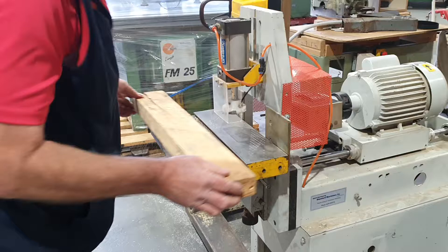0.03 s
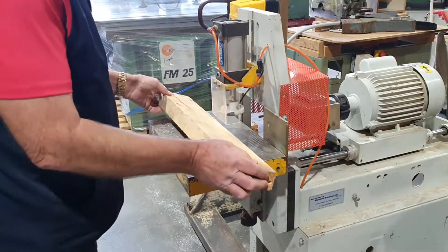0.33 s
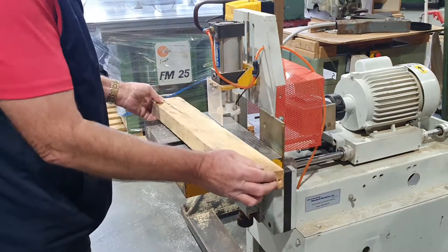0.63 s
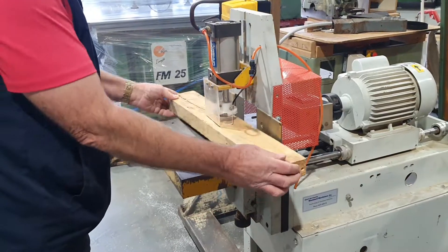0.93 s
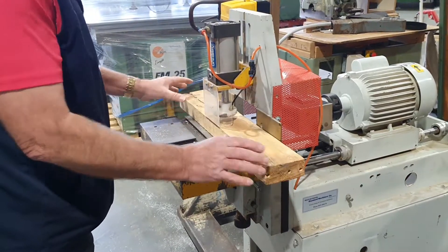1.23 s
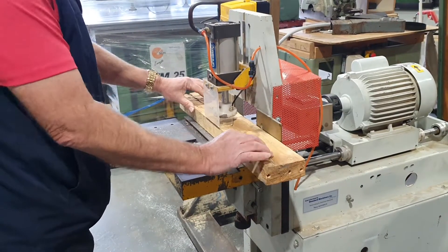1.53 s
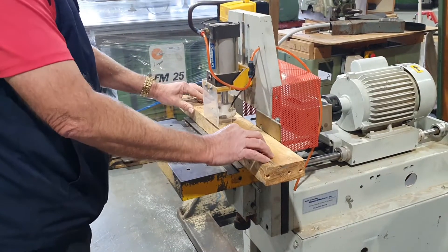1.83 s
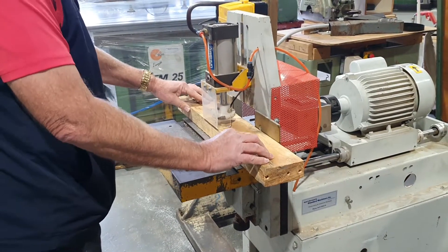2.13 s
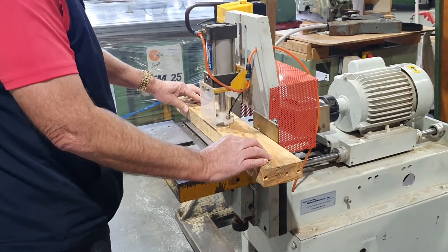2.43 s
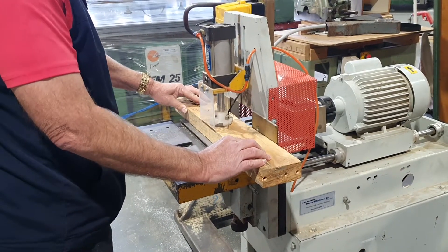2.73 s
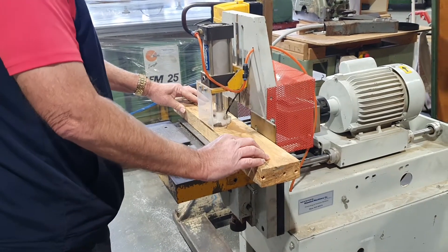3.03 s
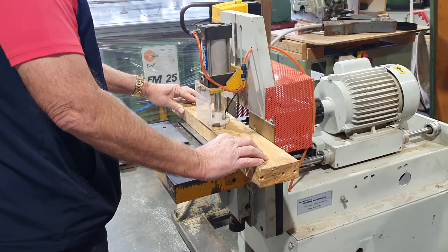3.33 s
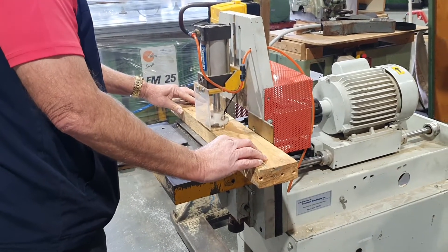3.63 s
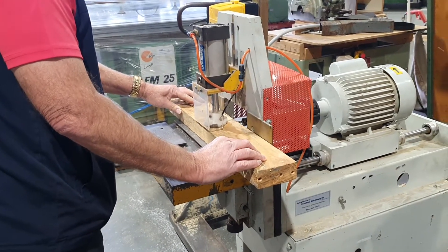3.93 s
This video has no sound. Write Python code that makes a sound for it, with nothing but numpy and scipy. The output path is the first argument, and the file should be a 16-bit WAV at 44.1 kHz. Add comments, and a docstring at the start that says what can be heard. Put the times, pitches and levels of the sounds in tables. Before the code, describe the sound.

A wood boring machine's motor hums, then compressed air hisses loudly over it.

```python
"""Compressed air spits from a valve, then hisses, squeals and whistles as it clamps a plank and feeds
the drill of a wood boring machine. Behind it the induction motor hums, the fan blades whirr and the
rotor whines. Before the air starts, the plank is knocked onto the table and echoes in the workshop;
at the end the drill bites. A gain control ducks the motor under the air."""
import sys
import numpy as np
from scipy import signal
from scipy.fft import rfft, irfft
from scipy.io import wavfile
from scipy.ndimage import uniform_filter1d

SR = 44100
rng = np.random.default_rng(int(sys.argv[2]) if len(sys.argv) > 2 else 0)


def generate_wav(signal):
    """Clip the signal to [-1, 1] and save it as 16-bit WAV at the path in sys.argv[1]."""
    frames = np.transpose(np.atleast_2d(signal))
    scaled = np.clip(frames, -1, 1) * 32767
    pcm = np.round(scaled).astype(np.int16)
    wavfile.write(sys.argv[1], SR, pcm)


N = 176400
T = np.arange(N) / SR
BINS_HZ = np.maximum(np.arange(N // 2 + 1) * SR / N, 1)
MOTOR_LAG_S, AIR_LAG_S, TONE_LAG_S = .00005, .00003, .000027  # left behind right


def from_db(db):
    """Decibels to gain."""
    return 10 ** (np.asarray(db) / 20)


def in_time(rows):
    """Columns of a curve at every sample."""
    times, *columns = np.transpose(rows)
    return np.array([np.interp(T, times, c) for c in columns])


def at_hz(rows, hz):
    """Columns of a spectrum at given frequencies."""
    freqs, *columns = np.transpose(rows)
    return np.array([np.interp(np.log(hz), np.log(freqs), c) for c in columns])


def drift(rate_hz):
    """Smooth random wander, spread about 1."""
    count = int(8 * max(rate_hz, 1) * N / SR) + 2
    poles = [np.exp(-np.pi / 4)] * 2
    slow = signal.lfilter([1], np.poly(poles), rng.standard_normal(count + 20))[20:]
    return np.interp(T, np.linspace(0, N / SR, count), slow / slow.std())


def stereo_noise(spectrum, correlation, lag_s):
    """Partly correlated noise with a given density per channel."""
    alike = np.clip(at_hz(correlation, BINS_HZ)[0], 0, 1)
    mid, side = rfft(rng.standard_normal((2, N)))
    pair = np.sqrt(1 + alike) * mid + np.sqrt(1 - alike) * side * [[1], [-1]]
    pair[0] *= np.exp(-2j * np.pi * BINS_HZ * lag_s)
    return irfft(pair * from_db(at_hz(spectrum, BINS_HZ)), N) * np.sqrt(SR) / 2


def resonant_noise(hz, width_hz):
    """Noise in one steep resonance, rms 1."""
    detuning = (BINS_HZ - hz ** 2 / BINS_HZ) / width_hz
    band = irfft(rfft(rng.standard_normal(N)) / (1 + detuning ** 2), N)
    return band / band.std()


def ring(clicks, hz, t60_s):
    """Each click excites a damped sine."""
    r, w = from_db(-60 / (t60_s * SR)), 2 * np.pi * hz / SR
    highpassed = signal.lfilter([1, -1], [1, w / 2 - 1], clicks) + 1e-18
    return signal.lfilter([0, np.sin(w)], [1, -2 * r * np.cos(w), r * r], highpassed)


def workshop(sound, echo_db=-5, t60_s=.42):
    """Adds the room's dull, dying echo, different on each side."""
    dull = signal.lfilter([1], [1, -.8], rng.standard_normal((3, SR // 2)))
    tails = dull * from_db(-60 * T[:SR // 2] / t60_s)
    response = tails[:2] / 2 + tails[2]
    response /= np.sqrt(np.sum(response ** 2) * 2)
    return sound + from_db(echo_db) * signal.fftconvolve(sound[None], response, axes=1)[:, :N]


# shaft speed: t/s, rotation/Hz
SHAFT_SPEED = [(0, 49.73), (2.2, 49.73), (2.8, 49.68), (3.55, 49.67), (3.75, 49.5), (4, 49.44)]
IDLE_HZ = SHAFT_SPEED[0][1]
def shaft_angle():
    """Shaft rotation in rad; the speed sags under load."""
    return 2 * np.pi * np.cumsum(in_time(SHAFT_SPEED)[0]) / SR


# rumble envelope: t/s, level/dB
RUMBLE = [(.1, -57), (.28, -45), (.5, -39), (.7, -66), (2.5, -53), (3.6, -46.5), (3.92, -32.5)]
def frame_rumble():
    """The machine frame rumbles in one low resonance."""
    return from_db(in_time(RUMBLE)) * resonant_noise(hz=84.5, width_hz=58)


# fan and bearing noise: f/Hz, left density/dB, right density/dB
MOTOR_NOISE = [(25, -87, -84), (54.6, -64, -63.5), (150, -66.5, -67.5), (267, -63, -63.5),
               (430, -72.5, -71.5), (525, -67.5, -66), (1310, -63.5, -65), (1450, -63, -65.5),
               (1870, -67.5, -69.5), (2900, -64.5, -63.5), (3030, -62, -56), (3400, -66.5, -63.5),
               (3710, -59, -54.5), (4200, -66, -63.5), (4420, -67, -56), (5620, -84, -62.5),
               (6800, -88.5, -66), (8000, -107, -86), (8820, -84.5, -71), (11500, -84, -74),
               (15600, -96, -102)]
# machine stereo image: f/Hz, correlation (below 0 for pure tones only)
MOTOR_CORRELATION = [(190, 0.98), (700, 0.89), (1400, 0.25), (3000, 0.19), (3750, -.7), (5000, -0.11)]
def motor_noise(angle, gain_db=-.5, shaft_depth=.19, slip_depth=.14, slip_rattle_hz=22.02):
    """Fan and bearing noise throbs with the shaft and a slower slip rattle."""
    shaft_rattle = shaft_depth * (np.cos(angle) + np.cos(2 * angle)) / 2
    slip_rattle = slip_depth * np.cos(2 * np.pi * slip_rattle_hz * T)
    rush = stereo_noise(MOTOR_NOISE, MOTOR_CORRELATION, MOTOR_LAG_S)
    return from_db(gain_db) * (1 + shaft_rattle + slip_rattle) * rush


def motor_buzz(angle, over_density_db=11, scatter_db=1.5, turn_samples=8192):
    """Weak shaft harmonics: a rough pattern that repeats each turn."""
    multiples = np.arange(2, 150)
    hz = multiples * IDLE_HZ
    uneven_db = scatter_db * rng.uniform(-np.pi / 2, np.pi / 2, len(hz))
    gains = from_db(at_hz(MOTOR_NOISE, hz) + over_density_db + uneven_db)
    lag_rad = np.arccos(np.clip(at_hz(MOTOR_CORRELATION, hz), 0, 1))
    phases = rng.uniform(0, 2 * np.pi, len(hz)) - lag_rad * [[1], [0]]
    lines = np.zeros((2, turn_samples // 2 + 1), complex)
    lines[:, multiples] = gains * np.exp(1j * phases) * turn_samples / np.sqrt(2)
    position = angle / (2 * np.pi) % 1
    grid = np.arange(turn_samples) / turn_samples
    return np.array([np.interp(position, grid, turn) for turn in irfft(lines)])


# blade-rate harmonics from the first up: left level/dB, right level/dB
BLADE_TONES = [(-38.5, -47.5), (-36.7, -35.7), (-37.3, -40.3), (-51.5, -36.2), (-28.5, -26.8),
               (-37.7, -28.5), (-53, -43), (-59, -42)]
# swells of blade tones 1, 2 and 5: t/s, gain/dB
BLADE_1_SWELL = [(.1, 4), (.45, -4), (1.3, 3.5), (2.66, 1.5), (2.76, 13), (3.58, 12.5), (3.68, 4.5),
                 (4, 11.5)]
BLADE_2_SWELL = [(.1, -3), (.8, 1.5), (1.25, -0.5), (1.9, 1.5), (2.6, 2.5), (3.36, 5), (3.45, -2.5),
                 (3.7, 3.5), (3.9, 10)]
BLADE_5_SWELL = [(.8, -4.5), (1.7, -1), (2.8, 0.5)]
# strong shaft harmonics: multiple, left level/dB, right level/dB
SHAFT_TONES = [(2, -50, -50), (4, -40.3, -39.3), (8, -54, -53), (10, -49, -53), (43, -45, -53),
               (62, -53, -42), (73, -46, -46), (77, -34.5, -36), (106, -66, -41)]
# swell of the shaft harmonics below the blade rate: t/s, gain/dB
HUM_SWELL = [(1.3, 0.5), (1.6, 3), (3.3, 0.5), (3.5, -6.5), (3.85, 4)]
# rotor and bearing tones at idle: f/Hz, left level/dB, right level/dB
WHINE = [(1433, -46, -46), (1470, -48, -44), (2795, -47, -45), (3708, -42, -41), (3774, -49, -41),
         (4454, -49, -35), (5200, -60, -41)]
def motor_tones(angle, blades=15, waver_db=1.4, waver_hz=4, wander_rad=.22):
    """Blade tones, hum and rotor whine follow the shaft, each wavering by itself."""
    swells_db = {1: in_time(BLADE_1_SWELL)[0], 2: in_time(BLADE_2_SWELL)[0], 5: in_time(BLADE_5_SWELL)[0]}
    hum_db = in_time(HUM_SWELL)[0]
    tones = [(blades * k, db, swells_db.get(k, 0)) for k, db in enumerate(BLADE_TONES, 1)]
    tones += [(multiple, db, hum_db * (multiple < blades)) for multiple, *db in SHAFT_TONES]
    tones += [(hz / IDLE_HZ, db, 0) for hz, *db in WHINE]
    out = np.zeros((2, N))
    for multiple, db, swell_db in tones:
        phase = multiple * angle + rng.uniform(0, 2 * np.pi) + wander_rad * drift(waver_hz)
        lag_rad = np.arccos(np.clip(at_hz(MOTOR_CORRELATION, multiple * IDLE_HZ)[0], -1, 1))
        level = np.sqrt(2) * from_db(swell_db + waver_db * drift(waver_hz))
        out += from_db(db)[:, None] * level * np.sin([phase - lag_rad, phase])
    return out


# plank hits the table: t/s, relative level/dB, favoured f/Hz
KNOCKS = [(.25, -7, 90), (.976, -7, 1150), (1.002, 0, 280), (1.011, -7, 240), (1.021, 2.5, 580),
          (1.083, 0.5, 1000), (1.116, -7.5, 330), (2.28, -6.5, 200), (3.42, -10, 240)]
# plank modes: f/Hz, level/dB, t60/s
PLANK_MODES = [(160, -28, .2), (234, -25.5, .14), (380.6, -24.5, .2), (607, -25.5, .14), (814, -32, .06),
               (1040, -28, .06)]
def plank(scuff_db=-33.5, scuff_s=.031, thud_db=-15, focus_db_per_octave=6):
    """Each knock scuffs, thuds and rings the modes, favouring those near its own pitch."""
    times, knock_db, favoured_hz = np.transpose(KNOCKS)
    onsets = (times * SR).astype(int)
    clicks = np.zeros(N)
    clicks[onsets] = from_db(knock_db)
    scuff_decay = signal.lfilter([1], [1, -np.exp(-1 / (scuff_s * SR))], clicks + 1e-18)
    out = from_db(scuff_db) * scuff_decay * resonant_noise(hz=440, width_hz=870)
    out += from_db(thud_db) * ring(clicks, hz=420, t60_s=.007)
    for hz, mode_db, t60_s in PLANK_MODES:
        octaves_off = abs(np.log2(hz / favoured_hz))
        clicks[onsets] = from_db(knock_db + mode_db - focus_db_per_octave * octaves_off)
        out += ring(clicks, hz, t60_s)
    return out


# bite envelope: t/s, gain/dB
BITE = [(3.38, -27), (3.5, -10.5), (3.68, -10), (3.85, -2)]
# cutting noise: f/Hz, left density/dB, right density/dB
CUTTING = [(60, -65, -69), (250, -63.5, -66), (910, -56, -50.5), (1950, -53.5, -60), (3720, -56, -48),
           (7000, -88, -70)]
def drill(angle, pulse_depth=.22):
    """The bit's two lips scrape into the wood, two pulses per turn."""
    bite = from_db(in_time(BITE)) * (T > BITE[0][0])
    pulses = 1 + pulse_depth * np.cos(2 * angle)
    return bite * pulses * stereo_noise(CUTTING, MOTOR_CORRELATION, MOTOR_LAG_S)


def edge_tone(curve, gain_db, pan_db, shake_hz):
    """Edge tone of the air jet; turbulence shakes its pitch and level."""
    hz, db = in_time(curve)
    phase = 2 * np.pi * np.cumsum(hz + shake_hz * drift(600)) / SR
    flutter_db = 2 * np.tanh(drift(110)) + 2 * np.tanh(drift(20))
    level = from_db(db + gain_db + flutter_db) * (T > curve[0][0]) * (T < curve[-1][0])
    pan = from_db([[-pan_db / 2], [pan_db / 2]])
    return level * pan * np.sin([phase - 2 * np.pi * hz * TONE_LAG_S, phase])


def air_band(curve, pan_db, width_hz):
    """Turbulence in a moving resonance: a narrow, pitched hiss."""
    hz, db = in_time(curve)
    lowpass = signal.butter(2, width_hz / 2, fs=SR, output="sos")
    in_phase, quadrature = signal.sosfilt(lowpass, rng.standard_normal((2, N)))
    phase = 2 * np.pi * (np.cumsum(hz) / SR - hz * TONE_LAG_S * [[1], [0]])
    band = (in_phase * np.cos(phase) + quadrature * np.sin(phase)) / (2 * in_phase.std())
    level = from_db(db) * (T > curve[0][0]) * (T < curve[-1][0])
    pan = from_db([[-pan_db / 2], [pan_db / 2]])
    return level * pan * band


# whistle and jet resonance glides: t/s, f/Hz, relative level/dB
WHISTLE = [(2.86, 15600, -26), (2.885, 14950, -20), (2.99, 14350, -20), (3.045, 13550, -19),
           (3.13, 14200, -20), (3.26, 14060, -16), (3.45, 14440, -20), (3.85, 14520, -21), (4, 14830, -18)]
JET_RESONANCE = [(2.85, 4910, -40), (3.05, 5050, -30), (3.35, 5430, -20), (3.6, 5030, -19.5),
                 (4, 5080, -24)]
def feed_whistle():
    """During the feed the jet sounds a thin edge tone over a breathy resonance."""
    whistle = edge_tone(WHISTLE, gain_db=7, pan_db=3, shake_hz=98.6)
    return whistle + air_band(JET_RESONANCE, pan_db=15.5, width_hz=230)


# squeal, shrill hiss and rasp glides: t/s, f/Hz, relative level/dB
SQUEAL = [(2.255, 6200, -28), (2.285, 7400, -27), (2.305, 9550, -19), (2.33, 10500, -11.5),
          (2.357, 10800, -11.5), (2.365, 10850, -24)]
SHRILL = [(2.35, 10800, -8), (2.395, 11450, -2.5), (2.5, 11940, -2), (2.55, 13500, -13)]
RASP = [(2.205, 9000, -29), (2.245, 8870, -16.5), (2.262, 8600, -29)]
def valve_squeal():
    """The valve rasps as it opens fully; a rising squeal breaks up into shrill hiss."""
    squeal = edge_tone(SQUEAL, gain_db=3.5, pan_db=11, shake_hz=210)
    shrill = air_band(SHRILL, pan_db=7, width_hz=1700)
    rasp = air_band(RASP, pan_db=14, width_hz=1000)
    return squeal + shrill + rasp


# valve puff: f/Hz, left density/dB, right density/dB
SPIT = [(1800, -67, -66), (2710, -50, -51), (3100, -55, -54), (4600, -61, -44.5), (8150, -85, -66.5),
        (10600, -56, -52), (15700, -64, -67)]
# air stereo image: f/Hz, correlation
AIR_CORRELATION = [(1000, 0.82), (4000, 0.66), (8000, 0.96), (13000, 0.2)]
def valve_spit(peak_s=2.143, attack_s=.015, release_s=.036):
    """The opening valve lets out a short puff."""
    age_s = T - peak_s
    rise = np.exp(-(age_s / attack_s) ** 2 / 2)
    fall = np.exp(-abs(age_s) / release_s)
    return np.where(age_s < 0, rise, fall) * stereo_noise(SPIT, AIR_CORRELATION, AIR_LAG_S)


# escaping air: f/Hz, left density/dB, right density/dB
HISS = [(297, -85, -100), (980, -67.5, -67), (2200, -62, -64.5), (3020, -56, -54), (4250, -58, -48.5),
        (5370, -70.5, -47.5), (6720, -73, -54), (7960, -77, -79), (8550, -70, -63), (9900, -63.5, -59),
        (11650, -59, -48.5), (12200, -54.5, -53), (13800, -60, -58), (15700, -56, -125)]
# air flow while clamping and feeding: t/s, gain/dB
FLOW = [(2.17, -20), (2.225, -0.5), (2.275, 0), (2.6, 3.5), (2.69, 2.1), (2.8, 2), (4, 1.2)]
# air line resonances: f/Hz, width/Hz, left level/dB, right level/dB
LINE_RESONANCES = [(2640, 280, -35, -31.5), (3050, 190, -30, -23), (3600, 580, -29, -19)]
# surge in those resonances: t/s, gain/dB
SURGE = [(2.2, -11), (2.285, -2), (2.46, -5), (2.54, 1), (2.635, 4), (2.675, -5), (2.765, 2), (2.85, 3),
         (2.9, -6.5), (4, -5.5)]
def air_stream(flutter_db=.67, flutter_hz=60):
    """Compressed air hisses out, surging in the hollow resonances of the line."""
    flow = from_db(in_time(FLOW) + flutter_db * drift(flutter_hz))
    hollows = sum(from_db(db)[:, None] * resonant_noise(hz, width) for hz, width, *db in LINE_RESONANCES)
    surge = from_db(in_time(SURGE)) * hollows
    hiss = flow * stereo_noise(HISS, AIR_CORRELATION, AIR_LAG_S)
    return (T > FLOW[0][0]) * (hiss + surge)


def scene():
    """Motor, plank, air and drill; only the plank echoes."""
    angle = shaft_angle()
    motor = motor_tones(angle) + motor_buzz(angle) + frame_rumble() + motor_noise(angle)
    knocks = workshop(plank())
    air = air_stream() + valve_spit() + valve_squeal() + feed_whistle()
    return motor + knocks + air + drill(angle)


def record(dry, threshold_db=-23, slope=.56, attack_s=.15, release_db_per_s=12.5):
    """Gain control ducks loud passages and recovers slowly; brief silence first, top cut off."""
    start_s, cutoff_hz = .106, 15850
    level_db = 10 * np.log10(uniform_filter1d(np.mean(dry ** 2, axis=0), size=900) + 1e-12)
    over_db = np.maximum(level_db - threshold_db, 0)
    release_db = release_db_per_s * T
    held_db = np.maximum.accumulate(over_db + release_db) - release_db
    pole = np.exp(-1 / (attack_s * SR))
    duck_db = slope * signal.lfilter([1 - pole], [1, -pole], held_db)
    ducked = dry * from_db(-duck_db) * (T > start_s)
    return irfft(rfft(ducked) / (1 + (BINS_HZ / cutoff_hz) ** 200), N)


dry = scene()
out = record(dry)
generate_wav(out)
```